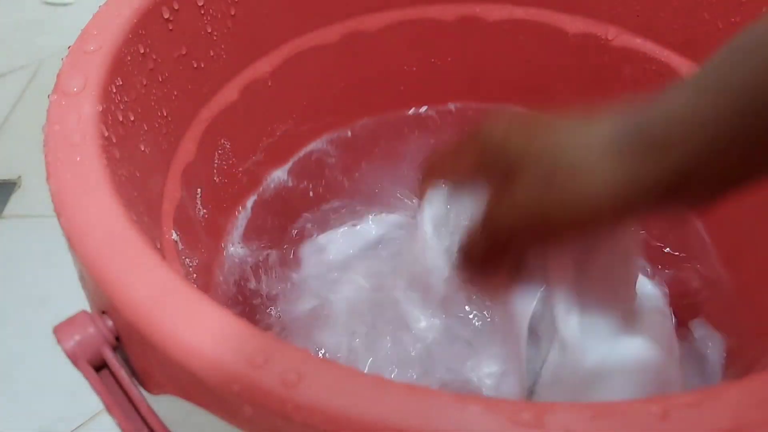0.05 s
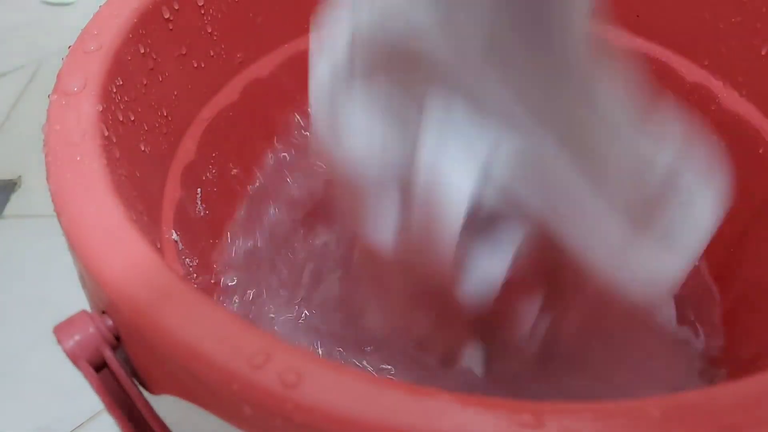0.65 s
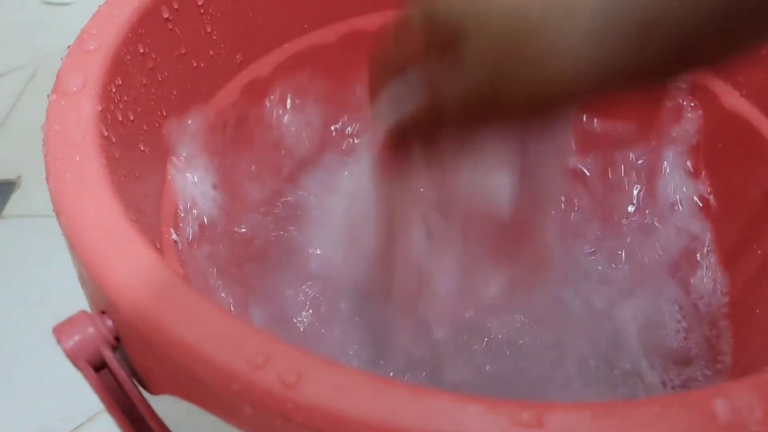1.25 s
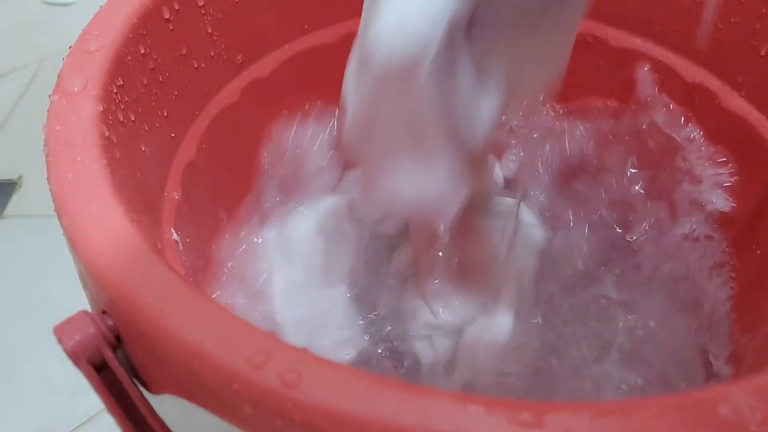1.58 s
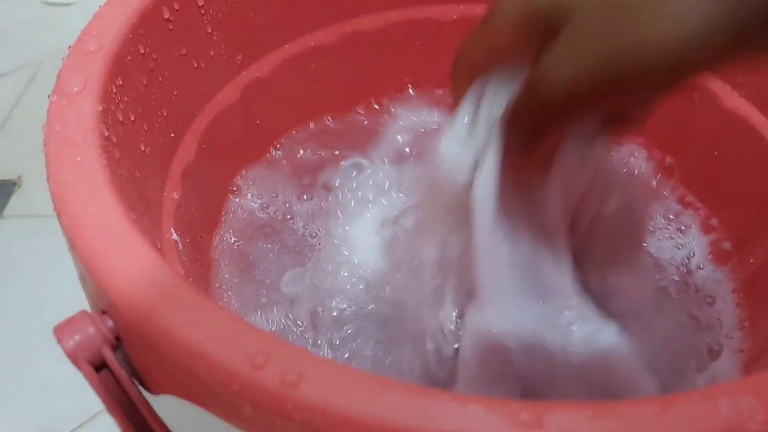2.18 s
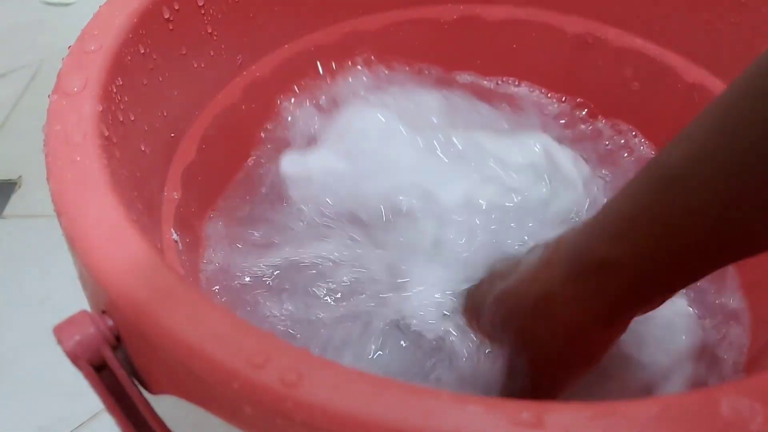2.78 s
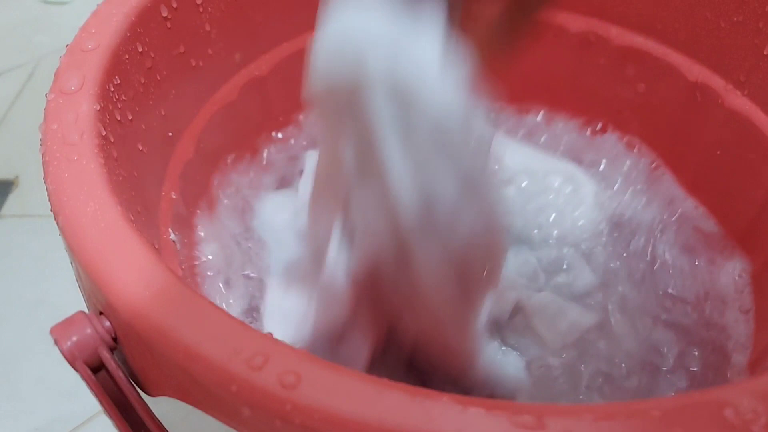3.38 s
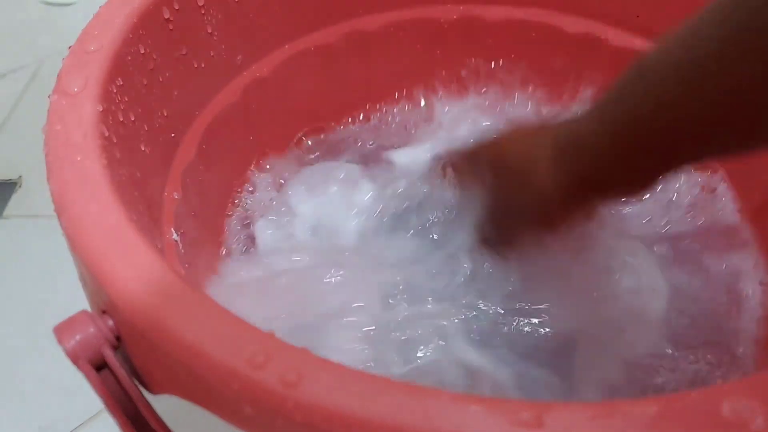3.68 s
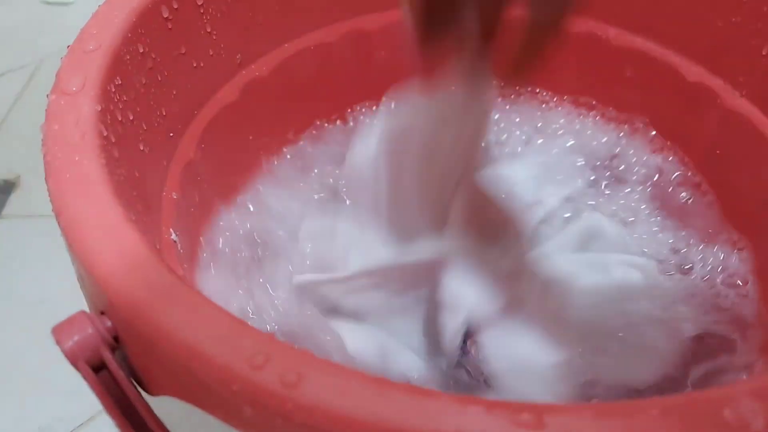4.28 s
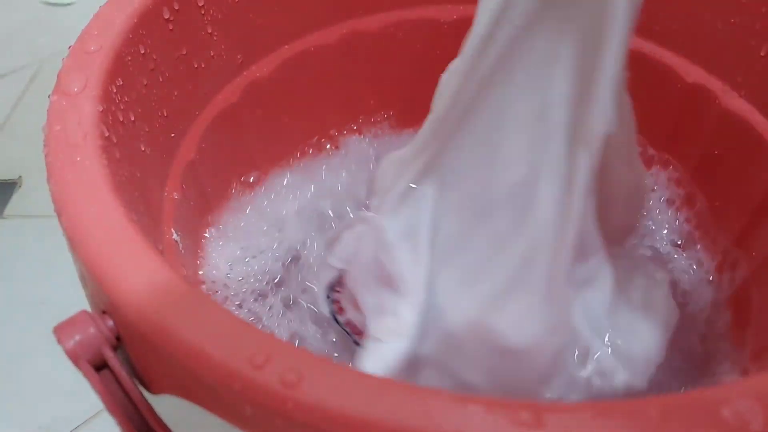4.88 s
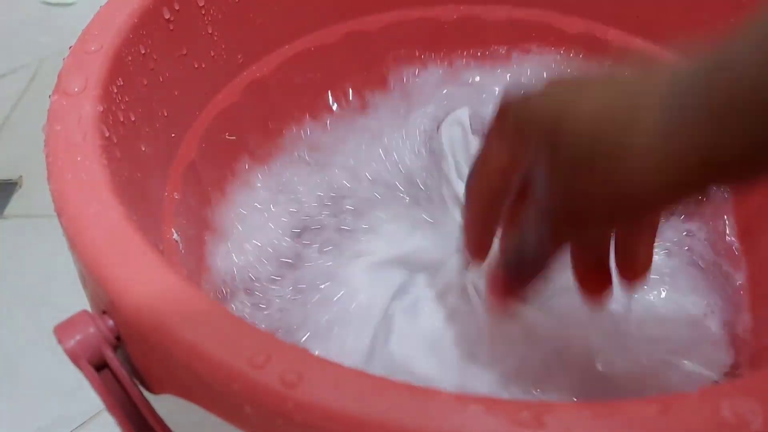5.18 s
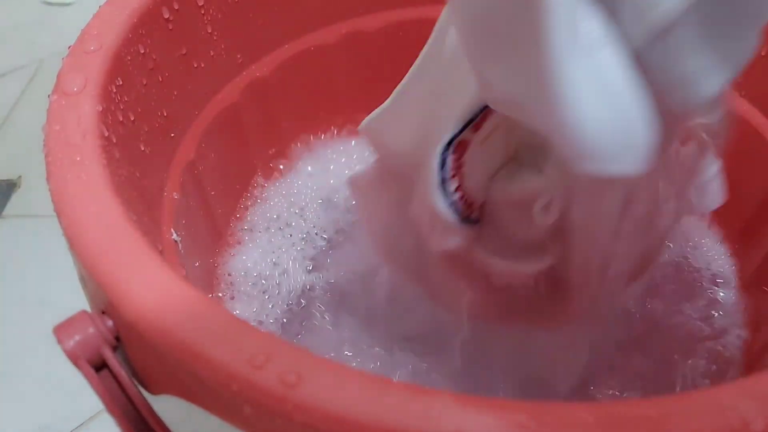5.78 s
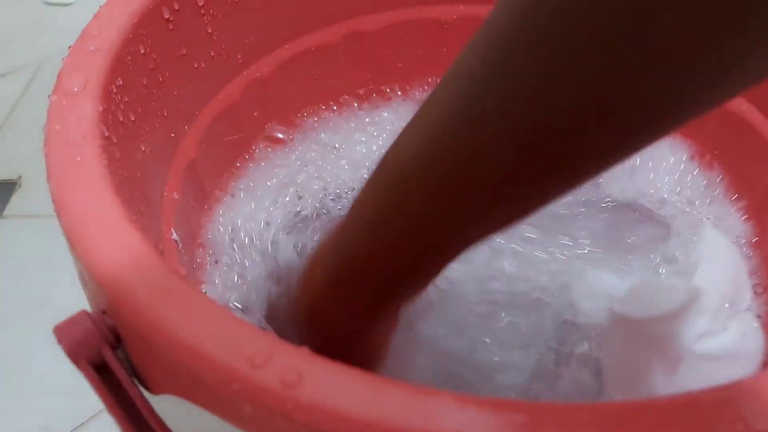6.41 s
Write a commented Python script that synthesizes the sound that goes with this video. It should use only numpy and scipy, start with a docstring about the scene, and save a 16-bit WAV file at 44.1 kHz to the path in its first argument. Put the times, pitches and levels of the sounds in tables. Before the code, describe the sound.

Wet cloth is plunged and lifted in a bucket of soapy water, with close sloshes, splashes, low gulps and trickling runoff.

```python
"""Wet cloth is washed by hand in a plastic bucket of soapy water, heard from close by in a small tiled room.
A quick run of plunges opens: each traps air pockets, which pulsate and gulp in the bucket's cavity modes.
Between plunges the cloth is lifted, and its runoff entrains small bubbles that ring amid spray and drips.
The strongest plunge comes at 1.75 s; slower strokes follow, a little under a second apart.
Near 6 s a last pour falls in pitch as its bubbles grow, and two more plunges end the scene."""
import sys
import numpy as np
from scipy import signal
from scipy.fft import rfft, irfft, next_fast_len
from scipy.io import wavfile
from scipy.ndimage import uniform_filter1d

SR = 44100
rng = np.random.default_rng(int(sys.argv[2]) if len(sys.argv) > 2 else 0)


def file_out(sig):
    """Save sig as 16-bit WAV at sys.argv[1]."""
    # one column per channel
    cols = np.atleast_2d(sig).T
    # limit, then scale
    lim = np.clip(cols, -1, 1)
    pcm = np.round(lim * 32767).astype(np.int16)
    wavfile.write(sys.argv[1], SR, pcm)


N = 284445
LAG_S = 0.00012  # the water is nearer to the microphone's right port
CONTROL_HZ = 500
CONTROL_TIMES = np.arange(0, N / SR, 1 / CONTROL_HZ)


def amp(db):
    """Amplitude ratio of a level in decibels."""
    return 10 ** (np.asarray(db) / 20)


def unit(x):
    """Normalisation to rms 1."""
    return x / np.sqrt(np.mean(x ** 2) + 1e-20)


def along(points, hz):
    """Interpolation of (f/Hz, value) points on a logarithmic frequency axis."""
    f, values = np.transpose(points)
    return np.interp(np.log(hz + 1), np.log(f), values)


def wobble(per_s):
    """Random modulation: linear interpolation between Gaussian knots."""
    knots = rng.standard_normal(4096)
    return np.interp(np.arange(N) * per_s / SR, np.arange(len(knots)), knots)


def filtered(x, response):
    """Convolution theorem: the spectrum is multiplied by a frequency response."""
    size = 2 * next_fast_len(N // 2 + SR // 2)
    return irfft(rfft(x, size) * response(np.fft.rfftfreq(size, 1 / SR)), size)[..., :N]


def coloured(x, points, size=8192):
    """Minimum-phase filter through (f/Hz, gain/dB) points, by folding the cepstrum."""
    cepstrum = irfft(np.log(amp(along(points, np.fft.rfftfreq(size, 1 / SR)))))
    cepstrum[1:size // 2] *= 2
    cepstrum[size // 2 + 1:] = 0
    impulse = irfft(np.exp(rfft(cepstrum)))
    return signal.oaconvolve(x, impulse if x.ndim == 1 else impulse[None], axes=-1)[..., :N]


def add(track, s, sound):
    """Superposition of a sound on a track at time s."""
    start = max(round(s * SR), 0)
    track[start:start + len(sound)] += sound[:N - start]


def steady(x, span_s):
    """Division by the running rms evens out a stream's level and leaves its grain."""
    power = np.mean(x ** 2, axis=0)
    for _ in range(2):
        power = np.abs(uniform_filter1d(power, int(span_s * SR)))
    return x / np.sqrt(power + power.mean() / 1000)


# Spectrum of the quiet room: f/Hz, gain/dB
AMBIENT_SPECTRUM = [(20, -8), (55, 3), (150, 0.5), (400, -21.5), (1500, 0), (5000, -3.5), (16000, -21)]
def ambience():
    """Noise floor: faint shaped noise, uncorrelated between the ports."""
    return amp(-58) * unit(coloured(rng.standard_normal((2, N)), AMBIENT_SPECTRUM))


# Reverberation time of the tiled room: f/Hz, T60/s
TILE_DECAY = [(200, 0.47), (1000, 0.26), (4000, 0.24), (14000, 0.34)]
def impulse_response():
    """Early reflections from the bucket's wall precede the exponential decay of the tiled room."""
    hz, t, noise = signal.stft(rng.standard_normal((2, SR // 3)), SR, nperseg=256)
    decay = amp(-60 * t / along(TILE_DECAY, hz)[:, None])
    tail = signal.istft(noise * decay, SR, nperseg=256)[1]
    age = np.arange(tail.shape[1]) / SR
    wall = rng.standard_normal(tail.shape) * np.exp(-age / 0.0051) * (age > .0007)
    tail = tail * (age > .005)
    hz = np.fft.rfftfreq(len(age), 1 / SR)
    foam = 1 / (1 + (hz / 2000) ** 2)  # foam absorbs treble inside the bucket
    early = amp(-1.5) * foam * rfft(wall / np.linalg.norm(wall[0]))
    late = amp(-5.5) * rfft(tail / np.linalg.norm(tail[0]))
    # long waves reach both ports alike and are reflected less
    shortness = hz ** 2 / (hz ** 2 + 380 ** 2)
    width = np.pi / 4 * shortness
    mid, side = irfft((early + late) * [np.cos(width), np.sin(width)] * (1 + shortness) / 2)
    return np.array([mid + side, mid - side])


def reverberation(x, segments=56):
    """Time-varying convolution: the echo paths change as arm, cloth and water move."""
    wet, hop = np.zeros((2, N)), N // segments + 1
    for centre in range(0, N + hop, hop):
        at = np.arange(max(centre - hop, 0), min(centre + hop, N))
        part = x[1, at] * np.cos(np.pi / 2 * (at - centre) / hop)
        for track, response in zip(wet, impulse_response()):
            add(track, at[0] / SR, signal.fftconvolve(part, response))
    return wet


# Spectrum of the shaken bucket: f/Hz, gain/dB
RUMBLE_SPECTRUM = [(20, -39), (38, -37), (53, 4.5), (72, -3), (92, 0.5), (130, -10), (200, -49), (500, 0),
                   (1500, -51)]
def wall_rumble(level_db):
    """Forced vibration: the moving mass of water shakes the bucket's wall."""
    mid, side = unit(coloured(rng.standard_normal((2, N)), RUMBLE_SPECTRUM))
    return amp(level_db + 2) * (mid + amp(-26.5) * np.array([side, -side]))


# Air modes of the bucket and the room: f/Hz, bandwidth/Hz, relative gain/dB
AIR_MODES = [(210, 2.6, -2.5), (202.7, 3.6, -9.5), (284.4, 5.4, -4.5), (325, 6.9, -18), (367.2, 7.3, 4),
             (390, 6, -3.5), (430.7, 18.2, 0), (502.8, 10, -5.5), (668, 190, -21)]
def cavity(x):
    """Modal resonance: damped modes of the air in and around the bucket add to the direct sound."""
    def modes(f):
        return sum(amp(db) * 1j * f * width / (hz * hz - f * f + 1j * f * width)
                   for hz, width, db in AIR_MODES)
    return filtered(x, lambda f: 1 + amp(13) * modes(f))


def bubble(t, hz, t60, rise, phase_lag):
    """Minnaert resonance: a damped pulsation whose pitch climbs as the bubble nears the surface."""
    phase = 2 * np.pi * hz * t * (1 + rise * t / t60 / 2)
    onset = 1 - np.exp(-t * hz / 0.43)
    return np.sin(phase - phase_lag) * amp(-60 * t / t60) * onset


def single_bubbles(rows, rise):
    """Free oscillation of one bubble per row of t/s, level/dB, f/Hz, T60/s."""
    pair, t = np.zeros((2, N)), np.arange(SR // 6) / SR
    for s, db, hz, t60 in rows:
        left_lag = np.pi / 2 * np.tanh(4 * hz * LAG_S)
        for track, phase_lag in zip(pair, (left_lag, 0)):
            ring = bubble(t, hz, t60, rise, phase_lag)
            add(track, s, amp(db) * ring / np.abs(ring).max())
    return pair


def swarm(level_db, centre_hz, octaves, cycles, spread_db, rise, crowding, count):
    """Incoherent sum of random bubbles, born more often where the water is worked harder."""
    when, size, life, strength, place, sign, lean = rng.random((7, count))
    cumulative_rate = np.cumsum(amp(crowding * level_db))
    start = np.searchsorted(cumulative_rate, when * cumulative_rate[-1])
    hz = np.broadcast_to(centre_hz, N)[start] * 2 ** (octaves * (size - .5))
    t60 = cycles / hz * 2 ** (2 * life - 1)
    strength_db = -spread_db * np.log(strength * .995 + .005)
    gain = amp(strength_db) * np.sign(sign - .5) * np.sqrt(hz)
    length = (t60 * SR * 2 / 3).astype(int) + 1
    k = np.repeat(np.arange(count), length)  # the bubble each sample belongs to
    age = np.arange(len(k)) - (np.cumsum(length) - length)[k]
    pan = amp(6 * (2 * lean - 1) * hz / (hz + 800))  # short waves differ most between the ports
    left_lag = 2 * np.pi * hz * LAG_S * (4 * place - 1.1)  # set by the place across the bucket
    left = (gain * pan)[k] * bubble(age / SR, hz[k], t60[k], rise, left_lag[k])
    right = (gain / pan)[k] * bubble(age / SR, hz[k], t60[k], rise, 0)
    return np.array([np.bincount(start[k] + age, wave, N)[:N] for wave in (left, right)])


# Spectral shaping of foam and droplets: f/Hz, gain/dB
SPRAY_SPECTRUM = [(600, -23.5), (1800, 9.5), (3000, -0.5), (4500, -3.5), (6500, -4.5), (8500, -4.5),
                  (10000, -11.5), (12500, -6.5), (16000, -9)]
def spray(level_db):
    """Damping sets the timbre: foam bubbles tinkle, short-lived droplets crackle, over a fine fizz."""
    tinkle = swarm(level_db, centre_hz=6600, octaves=2.3, cycles=26,
                   spread_db=3.9, rise=.13, crowding=.7, count=10000)
    crackle = swarm(level_db, centre_hz=7500, octaves=2, cycles=4,
                    spread_db=4.2, rise=.1, crowding=.9, count=5000)
    fizz = rng.standard_normal((2, N))
    grain = steady(tinkle, span_s=.15) + amp(-7) * steady(crackle, span_s=.2) + amp(-5) * fizz
    clumps = amp(1.5 * wobble(140) + 2.3 * wobble(35))
    return amp(level_db + 4.5) * steady(coloured(clumps * grain, SPRAY_SPECTRUM), span_s=0.16)


# Spectral shaping of the small bubbles: f/Hz, gain/dB
BUBBLING_SPECTRUM = [(300, -17), (600, -4), (1000, 3), (2000, 6.5), (3000, 4.5), (5000, -6.5), (9000, -33)]
def bubbling(level_db):
    """Air entrainment: water running off the cloth beats small bubbles into the surface."""
    stream = swarm(level_db, centre_hz=1800, octaves=3.6, cycles=16,
                   spread_db=3.3, rise=.24, crowding=.85, count=9500)
    return amp(level_db - 0.8) * steady(coloured(stream, BUBBLING_SPECTRUM), span_s=0.043)


# Water draining from the cloth: start t/s, end t/s, first f/Hz, last f/Hz, relative level/dB
POUR_GLIDES = [(0.187, 0.398, 1290, 550, -28.5), (1.263, 1.406, 1470, 790, -33.5),
               (2.243, 2.419, 1820, 676, -37.5), (3.898, 4.071, 730, 612, -43),
               (5.851, 6.028, 1250, 435, -39.5)]
def pours(count=16):
    """Pitch varies inversely with radius: as the cloth sinks back, its runoff traps larger bubbles."""
    rows = []
    for start, end, first_hz, last_hz, db in POUR_GLIDES:
        progress = (np.arange(count) + rng.random(count)) / count
        detune, strength = rng.standard_normal((2, count))
        hz = first_hz * (last_hz / first_hz) ** progress * np.exp(0.055 * detune)
        rows += zip(start + (end - start) * progress, db - 0.5 + 5 * strength, hz, 24 / hz)
    return single_bubbles(rows, rise=0.13)


# Drops falling from the cloth: t/s, relative level/dB, f/Hz
DROP_IMPACTS = [(0.1432, -16.5, 4750), (0.386, -10, 5200), (0.7036, -21, 2800), (0.9424, -8, 3210),
                (1.1044, -20, 2700), (1.2268, -22, 4650), (1.371, -33, 3330), (1.6761, -16.5, 4900),
                (1.8374, -13.5, 3230), (2.1815, -20.5, 2660), (2.395, -18, 3130), (2.5828, -19.5, 3050),
                (3.2906, -24, 3860), (3.6606, -24.5, 7550), (3.7627, -20, 4830), (3.883, -21, 4700),
                (4.1583, -22.5, 4050), (5.315, -26, 5400), (5.9262, -15.5, 5800), (6.0108, -14, 4730)]
def drips(t60=.018):
    """Entrainment by impact: each drop traps one small bubble that chirps upward."""
    return amp(-3) * single_bubbles([(s, db, hz, t60) for s, db, hz in DROP_IMPACTS], rise=0.126)


# Single large bubbles: t/s, relative level/dB, f/Hz, T60/s
CLOSING_CAVITIES = [(0.044, -25, 720, 0.0061), (0.189, -21.5, 1343, 0.061), (0.221, -15.5, 1510, 0.033),
                    (0.358, -14.5, 1114, 0.034), (0.522, -14.5, 707, 0.011), (0.688, -19.5, 620, 0.044),
                    (1.278, -18, 1440, 0.025), (1.381, -14.5, 669, 0.027), (1.687, -25, 1365, 0.076),
                    (2.247, -36, 650, 0.086), (2.351, -23.5, 690, 0.09), (2.389, -27.5, 654, 0.062),
                    (2.561, -20, 1206, 0.027), (3.021, -20, 1290, 0.0078), (3.332, -26, 731, 0.16),
                    (3.477, -23.5, 1015, 0.04), (3.926, -24.5, 699, 0.11), (4.105, -25.5, 1750, 0.044),
                    (4.299, -11.5, 1220, 0.01), (4.326, -17, 780, 0.046), (4.78, -28, 2060, 0.016),
                    (5.148, -11, 950, 0.015), (5.496, -25, 1687, 0.024), (5.574, -18, 1056, 0.036),
                    (5.646, -19, 1520, 0.011), (5.826, -26, 1230, 0.037), (5.847, -26, 1320, 0.032),
                    (6.122, -18.5, 1710, 0.037), (6.176, -22.5, 816, 0.02)]
def plops():
    """Pinch-off: a cavity closes and rings at its natural frequency."""
    return amp(-2.5) * single_bubbles(CLOSING_CAVITIES, rise=0.17)


# Wet cloth and thrown water striking the surface: t/s, relative level/dB, T60/s
SMACK_IMPACTS = [(0.143, -17.5, 0.021), (0.523, -19, 0.022), (0.615, -25, 0.028), (0.7455, -10, 0.02),
                 (0.953, -12, 0.018), (1.0589, -14.5, 0.033), (1.1466, -22.5, 0.045), (1.224, -22, 0.021),
                 (1.7023, -17, 0.03), (1.7433, -16, 0.021), (1.8634, -6, 0.014), (2.633, -22, 0.02),
                 (3.168, -29, 0.019), (3.295, -31.5, 0.043), (3.409, -31, 0.02), (3.4762, -22, 0.017),
                 (3.7632, -18.5, 0.026), (4.278, -27.5, 0.046), (4.295, -22, 0.045), (4.3235, -33, 0.024),
                 (4.4486, -20, 0.019), (5.1488, -36, 0.016), (6.2307, -16, 0.015)]
# Spectrum of a smack: f/Hz, gain/dB
SMACK_SPECTRUM = [(200, 4), (700, 6), (2000, 1), (4500, 8), (8500, 9.5), (10000, 0), (13000, 8),
                  (16000, -12)]
def smacks():
    """Impact noise: ragged bursts of spray scatter over the bucket, uncorrelated between the ports."""
    pair, t = np.zeros((2, N)), np.arange(SR // 5) / SR
    attack = 1 - np.exp(-t / 0.0021)
    for s, db, t60 in SMACK_IMPACTS:
        envelope = amp(db - 4) * attack * amp(-60 * t / t60)
        for track in pair:
            add(track, s, envelope * rng.standard_normal(len(t)))
    ragged = amp(3.5 * wobble(500))
    return coloured(pair * ragged, SMACK_SPECTRUM)


# Flat blows of the hand and heavy cloth: t/s, relative level/dB
SLAP_IMPACTS = [(0.522, -13.5), (0.623, -23), (0.752, -7.5), (0.941, -23), (1.744, -9.5), (2.691, -14),
                (3.33, -20.5), (3.58, -16), (3.716, -23), (3.763, -22), (4.327, -13), (5.149, -21),
                (6.228, -16)]
# Spectrum of a slap: f/Hz, gain/dB
SLAP_SPECTRUM = [(120, -28), (400, -3.5), (900, -4), (1800, 5.5), (3500, -37), (8000, -22), (16000, -45)]
def slaps(t60=0.026):
    """Impulsive excitation: a flat blow on the water gives a dull pressure pulse and a brief splutter."""
    track, t = np.zeros(N), np.arange(SR // 20) / SR
    for s, db in SLAP_IMPACTS:
        blow = amp(-17) * rng.standard_normal(len(t)) * amp(-60 * t / t60)
        blow[0] = 1  # the pressure pulse
        add(track, s + 0.000987, amp(db + 19.5) * blow)
    right = coloured(track, SLAP_SPECTRUM)
    left = np.pad(right, (round(LAG_S * SR), 0))[:N]
    return np.array([left, right])


# Air forced out from under the cloth: t/s, relative level/dB, f/Hz
ESCAPING_POCKETS = [(0.323, -28, 366), (0.622, -25, 420), (0.744, -19.5, 364.4), (1.006, -29.5, 440),
                    (1.748, -11, 396), (2.691, -20.5, 432), (3.581, -27.5, 480), (4.333, -23, 357),
                    (5.188, -22.5, 497), (6.037, -23.5, 369), (6.231, -18.5, 368.3)]
def gulps(t60=.08):
    """Volume pulsation: a plunge squeezes out one large air pocket, which rings at a low pitch."""
    rows = [(s, db, hz, t60) for s, db, hz in ESCAPING_POCKETS]
    return amp(-7) * single_bubbles(rows, rise=0.071)


def churning(level_db, pocket_hz):
    """Resonant excitation: big air pockets wobble under the cloth and boom in the bucket."""
    stream = swarm(level_db, pocket_hz, octaves=1.56, cycles=6.4,
                   spread_db=3.5, rise=0.13, crowding=.35, count=900)
    # the bucket radiates little below its lowest resonance
    radiated = signal.sosfilt(signal.butter(8, 184, "highpass", fs=SR, output="sos"), stream)
    return amp(level_db - 3) * steady(cavity(radiated), span_s=0.016)


def per_sample(control):
    return np.interp(np.arange(N) / SR, CONTROL_TIMES, control)


def swell(start, end, rise_db_per_s, fade_db_per_s):
    """Exponential growth until start and decay after end: straight slopes in decibels."""
    before = np.maximum(start - CONTROL_TIMES, 0)
    after = np.maximum(CONTROL_TIMES - end, 0)
    return -rise_db_per_s * before - fade_db_per_s * after


def power_sum(levels_db):
    """Incoherent sources add in power; their joint level in dB at every sample."""
    return per_sample(10 * np.log10(np.sum(amp(levels_db) ** 2, axis=0) + 1e-12))


# Shoves of the cloth through the water: t/s, hold/s,
# relative level/dB of churning, of bubbling, of spray and of rumble, air pocket f/Hz
PLUNGE_STROKES = [(0.0, .03, -36, -39.5, -61.5, -50, 418.3), (0.082, .045, -32, -39.5, -51, -49.5, 427),
                  (0.325, .045, -27.5, -26.5, -34.5, -61, 400), (0.62, .01, -22, -25.5, -28.5, -56, 428),
                  (0.747, .012, -18, -25.5, -30, -42, 362), (0.89, .115, -24, -38, -41.5, -51, 273),
                  (0.942, .01, -31, -30, -33, -45.5, 304), (1.202, .052, -32, -41, -42, -42, 256),
                  (1.383, .01, -30, -32, -43.5, -64, 372), (1.564, .02, -31, -36, -44.5, -51, 383),
                  (1.754, .015, -15, -33, -36, -50.5, 397), (1.835, .02, -28.5, -30.5, -34.5, -49, 385),
                  (2.70, .018, -26, -37.5, -44.5, -54, 399), (2.793, .035, -33, -37, -48, -50.5, 380),
                  (3.027, .015, -38, -43.5, -57, -52.5, 406), (3.48, .045, -38, -39.5, -44, -51, 386),
                  (3.581, .035, -30.5, -34.5, -40.5, -47, 344), (3.736, .05, -37, -42, -48, -55, 350),
                  (4.338, .022, -21, -29, -37.5, -57, 400), (4.485, .065, -29, -36, -48, -55.5, 356),
                  (5.155, .07, -31, -35.5, -42, -62, 397), (6.034, .025, -21.5, -34, -43, -67, 374),
                  (6.23, .018, -21, -32, -40.5, -49, 349)]
# Runoff from the raised cloth: start t/s, end t/s,
# first and last relative level/dB of bubbling, spray level/dB re bubbling
LIFT_STROKES = [(0.143, 0.375, -31, -27, -9), (0.419, 0.753, -32, -30.5, -4.5), (1.06, 1.389, -39, -35, -5),
                (1.503, 1.66, -39, -47, -1.5), (1.70, 1.734, -27.5, -28, -6), (2.19, 2.337, -42.5, -42, -8),
                (2.36, 2.64, -36.5, -38, -8), (3.135, 3.303, -49.5, -45, -7.5),
                (3.33, 3.434, -39, -44.5, -10.5), (3.90, 4.124, -41, -41, -6.5),
                (4.767, 4.852, -54, -55, -9), (4.96, 5.121, -51.5, -43.5, -5),
                (5.298, 5.525, -53.5, -53.5, -8), (5.578, 5.781, -41, -44, -8),
                (5.851, 6.178, -36.5, -36.5, -5)]
def washing(spray_lead_s=.011, sag_octaves_per_s=0.82, lift_pocket_hz=400):
    """Power addition of plunges and lifts sets four stream levels and the mean pitch of the pockets."""
    churn, bubbles, foam, rumble, pockets = [], [], [], [], []
    for s, hold, churn_db, bubbling_db, spray_db, rumble_db, pocket_hz in PLUNGE_STROKES:
        end = s + hold
        churn.append(churn_db + swell(s, end, rise_db_per_s=1100, fade_db_per_s=135))
        bubbles.append(bubbling_db + swell(s, end, 360, 140))
        # the surface splashes before the cloth goes under
        foam.append(spray_db + swell(s - spray_lead_s, end, 290, 195))
        rumble.append(rumble_db + swell(s, end, 95, 59))
        sinking_s = np.clip(CONTROL_TIMES - s, 0, .5)  # pockets grow as the cloth sinks
        pockets.append(pocket_hz * 2 ** (-sag_octaves_per_s * sinking_s))
    for start, end, first_db, last_db, spray_db in LIFT_STROKES:
        flow_db = np.interp(CONTROL_TIMES, [start, end], [first_db, last_db])
        flow_db += swell(start, end, 420, 185)
        churn.append(flow_db - 6.5)  # runoff hardly stirs the deep water
        bubbles.append(flow_db)
        foam.append(flow_db + spray_db)
        rumble.append(flow_db - 25)
        pockets.append(np.full(len(flow_db), lift_pocket_hz))
    mean_hz = np.average(pockets, axis=0, weights=amp(churn) ** 2 + 1e-20)
    return power_sum(churn), power_sum(bubbles), power_sum(foam), power_sum(rumble), per_sample(mean_hz)


def scene():
    """Superposition of surface and deep water sounds, their reverberation, rumble and room noise."""
    churn_db, bubbling_db, spray_db, rumble_db, pocket_hz = washing()
    spurts_db = 0.76 * wobble(per_s=24)  # the water moves in uneven spurts
    streams = bubbling(bubbling_db + spurts_db) + spray(spray_db + spurts_db)
    surface = cavity(streams + pours() + gulps() + plops() + drips() + slaps() + smacks())
    deep = churning(churn_db + spurts_db, pocket_hz)
    quiet = ambience()
    # the cloth covers the deep pockets, so less of their boom reaches the walls
    echoes = reverberation(surface + amp(-4) * deep)
    return surface + deep + echoes + wall_rumble(rumble_db) + quiet


# Response of the left port relative to the right: f/Hz, gain/dB
PORT_SHADOW = [(150, -3), (350, 0.5), (750, -0.1), (1400, 0.97), (2800, -7), (5500, -12.5), (10000, -16),
               (14000, -9.5)]
def record(dry, band_limit_hz=16300):
    """Acoustic shadow: the left port faces away from the water and loses treble; both are band-limited."""
    pair = np.array([coloured(dry[0], PORT_SHADOW), dry[1]])
    return filtered(amp(1) * pair, lambda hz: hz < band_limit_hz)


dry = scene()
out = record(dry)
file_out(out)
```